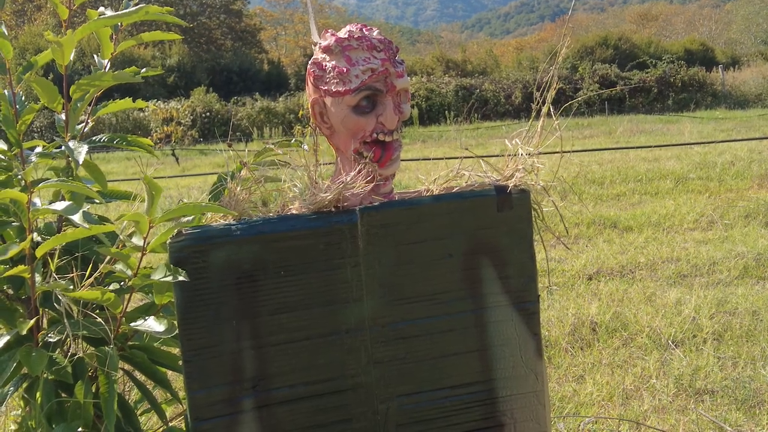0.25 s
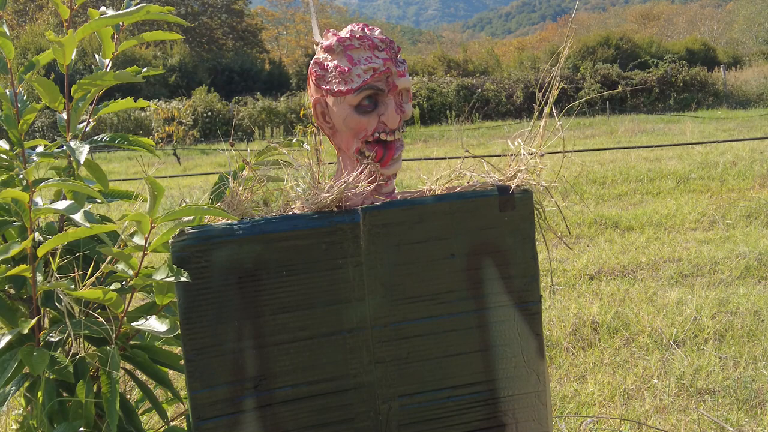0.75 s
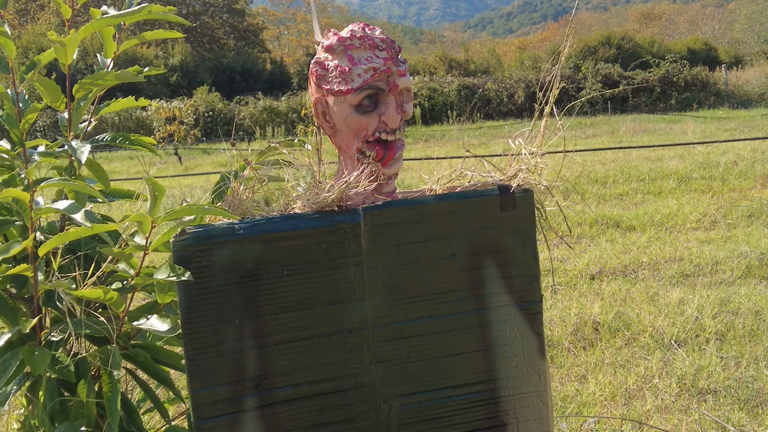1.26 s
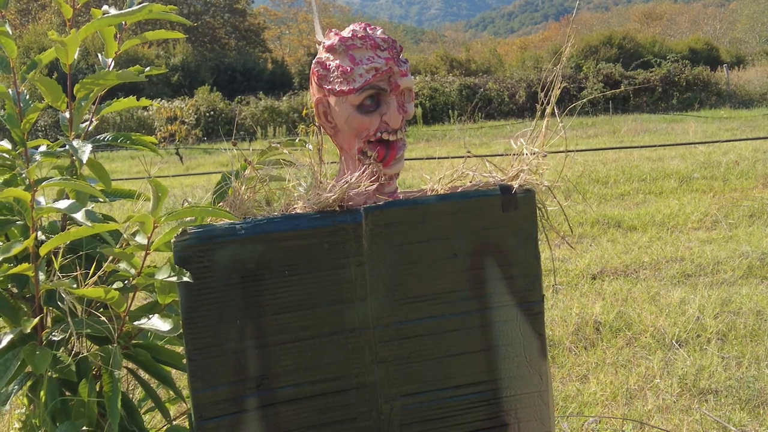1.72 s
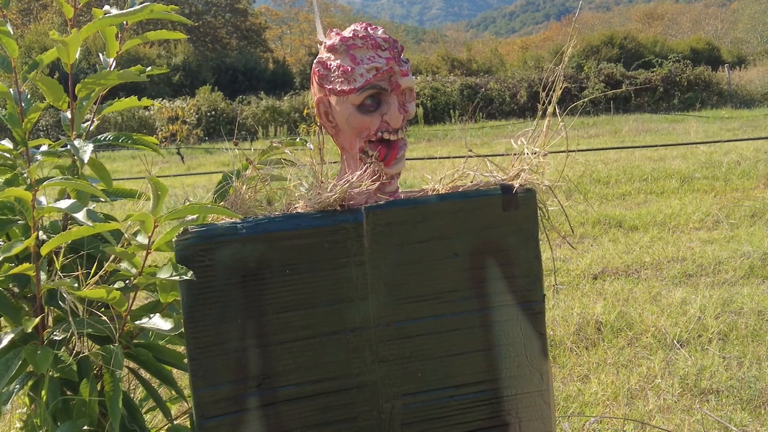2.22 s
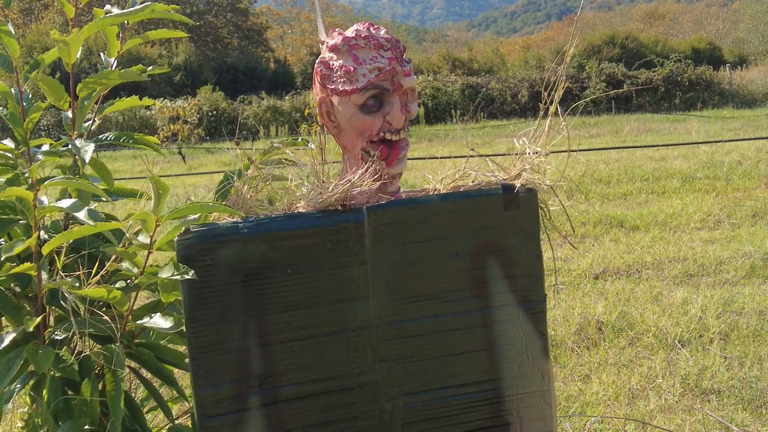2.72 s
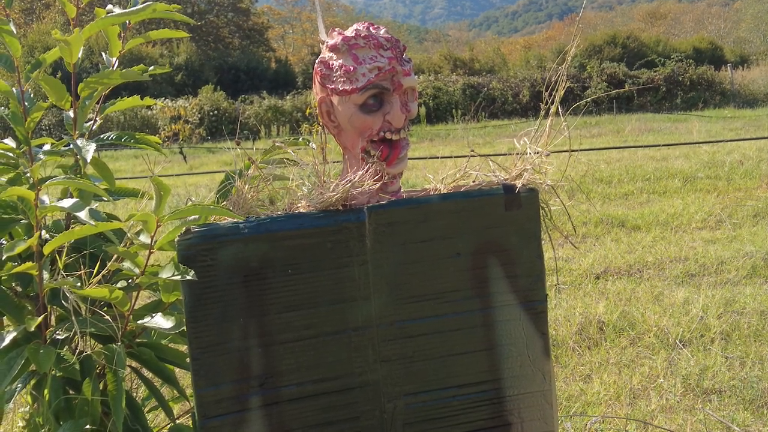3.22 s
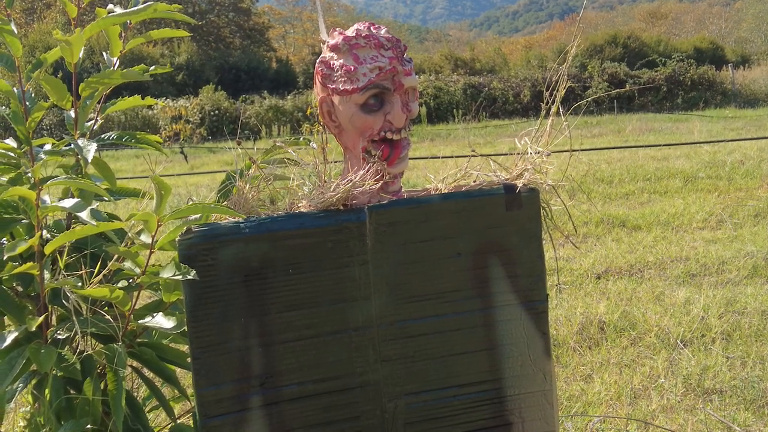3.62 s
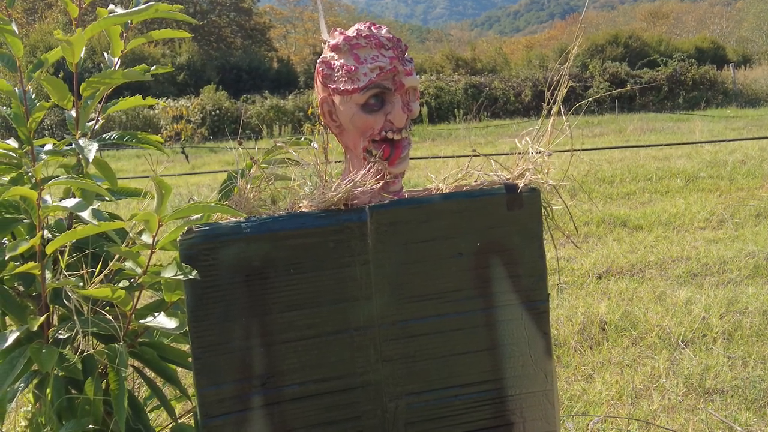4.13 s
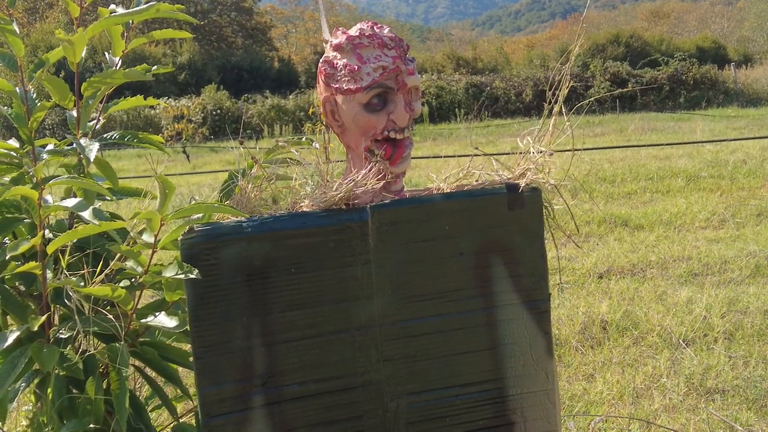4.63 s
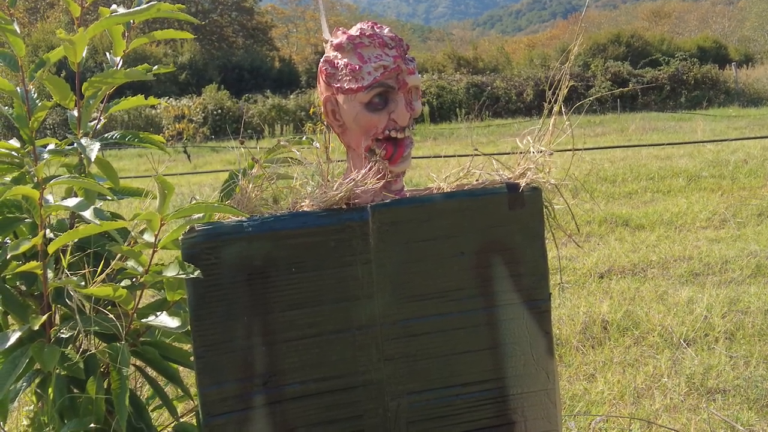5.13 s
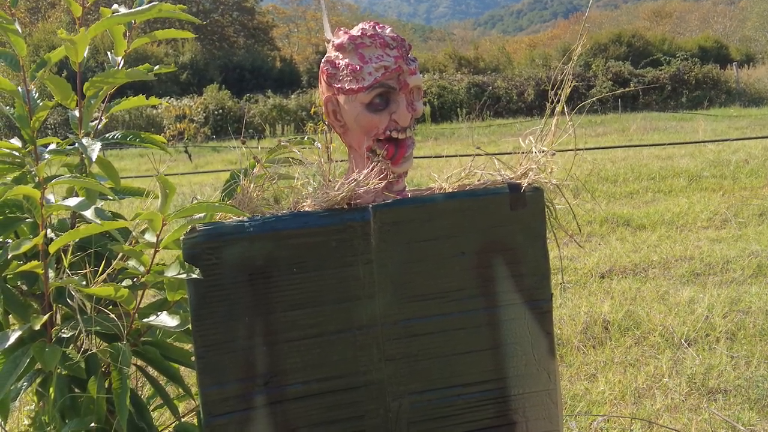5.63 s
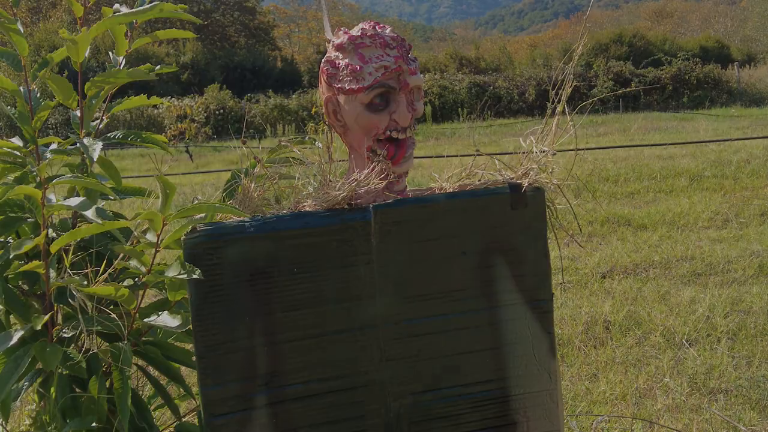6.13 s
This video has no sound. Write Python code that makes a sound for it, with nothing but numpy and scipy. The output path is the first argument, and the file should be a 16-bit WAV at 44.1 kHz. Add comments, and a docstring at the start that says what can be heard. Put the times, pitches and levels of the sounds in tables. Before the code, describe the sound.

A gas air pistol fires close to the microphone in an open field. Five sharp, loud cracks come at about 0.1, 1.4, 2.6, 3.8 and 5.1 seconds. Each has a brief metallic ring and a low thump of gas on the microphone, with the smack of a pellet on a target almost at once. Nearby trees return a soft, bright echo, and a far hedge adds a duller wash that dies within a second. After each shot the trigger is drawn and the magazine turns with a quick cluster of much quieter steel clicks, at about 0.8, 2.0, 3.2, 4.4 and 5.9 seconds. Underneath are quiet open air, a very faint far hum and a light wind rumble, strongest at the start, with short low buffets just after the first and last shots. Everything fades out from about 5.9 to 6.4 seconds.

```python
"""Five sharp cracks of a gas air pistol in an open field, each with the smack of a pellet on a target.
The valve snaps open, gas bursts from the muzzle and thumps the microphone, and the frame rings.
Nearby trees answer brightly, a far hedge with a duller wash. After each shot the trigger is drawn
and the magazine clicks round with small steel ticks. A light wind rumbles over a faint far hum."""
import sys
import numpy as np
from scipy import signal
from scipy.fft import rfft, irfft
from scipy.io import wavfile
from scipy.ndimage import uniform_filter1d, minimum_filter1d

SR = 44100
rng = np.random.default_rng(int(sys.argv[2]) if len(sys.argv) > 2 else 0)


def wav_record(signal):
    """Record a signal, one row per channel, as 16-bit PCM in the file named by sys.argv[1]."""
    frames = np.transpose(np.atleast_2d(signal))
    bounded = np.clip(frames, -1, 1)
    # unit amplitude maps onto the largest positive 16-bit level
    quanta = np.round(bounded * 32767).astype(np.int16)
    wavfile.write(sys.argv[1], SR, quanta)


N = 280476

# Shot cues, with levels ahead of each layer's trim: (valve opens [s], crack [dB], muzzle [dB],
# ring [dB], smack [dB], near echo [dB], far echo [dB], blast left [gain], blast right [gain],
# swirl left [gain], swirl right [gain], swirl rise [s], swirl decay [s])
SHOTS = [(0.103, -8, -5.5, -12.5, -11.5, -48, -48, 0.02, -0.44, 0.49, 3.5, 0.00056, .0145),
         (1.4485, -4, -4, -13.5, -11, -44, -50, 1.5, 0.54, -0.67, -5.5, 0.007, 0.018),
         (2.6108, -3, -2, -15.5, -13, -45.5, -52, 2, .9, -1.8, -5.5, .0035, .0155),
         (3.7669, -3.5, -7, -16.5, -14.5, -45, -52, 2, -0.078, -1.1, -3.5, .0015, .0155),
         (5.1056, -2.1, -2.5, -11.5, -11.5, -51, -51, 2.5, 1.4, .75, 2.5, 0.00044, 0.014)]
# Resonances of the pistol's report: (frequency [Hz], width [Hz], relative boost [dB])
REPORT_MODES = [(1244, 70, 4), (1600, 650, 3.5), (2374, 110, 4), (2990, 230, 4.5), (4070, 61, 4.5),
                (4250, 130, 4), (4710, 120, 3.5), (5230, 100, 6), (5700, 120, 4.5), (6000, 180, 3.5),
                (7800, 300, 3), (9300, 300, 2)]
# Wind rumble: (frequency [Hz], relative level [dB])
WIND_EQ = [(15, -2), (38, 1.5), (60, -9), (85, -12), (105, -20.5), (130, -21.5), (200, -31), (500, -52),
           (3000, -89)]
BLAST_START_S, BLAST_END_S = .0006, .0019  # after the valve opens


def amp(db):
    """Decibels to gain."""
    return 10 ** (np.asarray(db) / 20)


def unit(x):
    """Scales to an rms of one."""
    return x / np.sqrt(np.mean(x ** 2) + 1e-20)


def shape(points, hz):
    """Reads a curve on a log-frequency axis."""
    f, value = np.transpose(points)
    return np.interp(np.log(hz + 1), np.log(f), value)


def clock(seconds):
    """Sample times from zero."""
    return np.arange(int(seconds * SR)) / SR


def add(mix, s, sound):
    """Lays a stereo sound into the mix at time s."""
    part = mix[:, round(s * SR):][:, :sound.shape[1]]
    part += sound[:, :part.shape[1]]


def noise(size, alike):
    """Stereo white noise, from wide (alike=0) to mono (alike=1)."""
    shared, own = rng.standard_normal(size), rng.standard_normal((2, size))
    return np.sqrt(alike) * shared + np.sqrt(1 - alike) * own


def colour(x, eq, ringing=0, modes=REPORT_MODES, size=4096):
    """Minimum-phase EQ of unit power: a smooth curve plus resonances scaled by ringing."""
    hz = abs(np.fft.fftfreq(size, 1 / SR))
    peaks_db = sum(db / (1 + (2 * (hz - f) / width) ** 2) for f, width, db in modes)
    gain = unit(amp(shape(eq, hz) + ringing * peaks_db))
    response = np.exp(np.conj(signal.hilbert(np.log(gain))))
    taps = np.fft.ifft(response).real[:size // 2]
    return signal.oaconvolve(x, taps[None], axes=1)[:, :x.shape[1]]


def dying(t, t60, delay=0):
    """Exponential decay that starts after a delay."""
    return (t >= delay) * np.exp(-np.log(1000) * np.maximum(t - delay, 0) / t60)


def swell(t, db, hold, t60, delay=0, rise=.3):
    """Envelope of an echo from a deep surface: it builds up to its delay, holds, then dies away."""
    build = np.exp(-(np.minimum(t - delay, 0) / rise) ** 2)
    return amp(db) * build * dying(np.maximum(t - delay - hold, 0), t60)


def drift(t, mean_hz):
    """A slow random wander with an rms of one."""
    rate, phase = rng.random((2, 12, 1))
    return unit(np.sin(2 * np.pi * (2 * mean_hz * rate * t + phase)).sum(0))


def burst(envelope, alike):
    """A noise burst under an envelope, its energy spread evenly over frequency."""
    spectrum = rfft(noise(len(envelope), alike) * envelope)
    even = irfft(spectrum / (abs(spectrum) + 1e-12), len(envelope)) * np.sqrt(envelope)
    return unit(even) * np.sqrt(np.mean(envelope ** 2))


def ports(x):
    """The two microphone ports hear a frontal sound out of phase."""
    # (frequency [Hz], lead of the left port [rad])
    phase_lead = [(100, -0.5), (300, 0.9), (650, -2), (1400, -1.53), (2500, 0.5), (5900, -1.76),
                  (8400, -1.64), (11000, -2), (15000, -4.5)]
    turn = np.exp(.5j * shape(phase_lead, np.fft.rfftfreq(N, 1 / SR)))
    return irfft(rfft(x) * np.array([turn, turn.conj()]), N)


def field():
    """The bed: quiet open air and a faint, wavering far hum."""
    # Open air: (frequency [Hz], relative level [dB])
    air_eq = [(100, -5.5), (160, -10), (250, -12), (500, -16), (900, -19.5), (1290, -15.5), (2150, -20.5),
              (4000, -24), (7000, -27.5), (10000, -32), (14500, -26), (16000, -32.5)]
    # Hum: (frequency [Hz], width [Hz], level [dB])
    hum_tones = [(73.6, 3.5, -68.5), (569, 7, -80)]
    t = np.arange(N) / SR
    bed = amp(-64.5) * colour(noise(N, alike=.41), air_eq)
    for hz, width, db in hum_tones:
        waver = signal.lfilter(*signal.butter(2, width / 2, fs=SR), noise(N, alike=.94))
        bed += amp(db) * unit(waver * np.cos(2 * np.pi * hz * t))
    return bed


def wind():
    """A low rumble starts loud around the first shot and sinks into a gently wavering breeze."""
    t = np.arange(N) / SR
    opening_rumble_db = 12 * np.exp(-t / .18)
    level_db = -54.5 + 1.35 * drift(t, mean_hz=.64) + opening_rumble_db
    return amp(level_db) * colour(noise(N, alike=1), WIND_EQ, size=16384)


def eddies(flutter_hz=42):
    """Wind eddies press on the microphone ports in short, fluttering shoves."""
    # (time [s], length [s], pressure left [gain], pressure right [gain], flutter [share of pressure])
    shoves = [(0.111, 0.12, -.02, -0.23, 0.4), (0.224, 0.068, 0.0018, 0.18, 0.74),
              (5.128, 0.18, -0.028, -0.17, 0.39), (5.263, 0.13, 0.065, 0.21, 0.21)]
    out = np.zeros((2, N))
    for s, length, left, right, flutter in shoves:
        t = clock(length)
        pressure = np.outer([left, right], np.sin(np.pi * t / length))
        wobble = np.sin(2 * np.pi * (flutter_hz * t + rng.random()))
        rumble = .34 * colour(noise(len(t), alike=1), WIND_EQ)
        add(out, s, pressure * (1 + flutter * (wobble + rumble)))
    return out


def click(db, body, t60):
    """A steel part snaps home, bounces and rings; body runs from 0, bright pawl, to 1, dull latch."""
    # Tone of each part: (frequency [Hz], relative level [dB])
    pawl_eq = [(200, -23.5), (900, -14), (1500, -9), (2100, -19), (3200, -2), (4500, -2), (6500, -4),
               (9400, -1.5), (11000, -12.5), (14000, -2.5), (16000, -6)]
    latch_eq = [(200, -32.5), (900, -18.5), (1300, -9), (2000, 1), (2800, 1.5), (3600, 1), (6000, -12),
                (9000, -17), (11500, -21), (15000, -15)]
    # Steel resonances: (frequency [Hz], width [Hz], relative boost [dB])
    steel_modes = [(1570, 110, -1), (2200, 130, 1.5), (3025, 250, 3.5), (3730, 200, -4.5), (4460, 180, 3),
                   (6300, 350, 5), (7520, 350, 7.5), (9160, 280, 11.5), (13100, 460, 9)]
    t = clock(.12)
    snap = .55 * dying(t, .008)
    bounce = .3 * body * dying(t, .01, delay=.004)
    ring = .7 * dying(t, t60) + .1 * dying(t, .12)
    attack = 1 - np.exp(-t / .0003)
    rattle = burst(attack * (snap + bounce + ring), alike=.85)
    pawl, latch = (colour(rattle, eq, ringing=.84, modes=steel_modes) for eq in (pawl_eq, latch_eq))
    return amp(db) * ((1 - body) * pawl + body * latch)


def trigger():
    """Each pull takes up slack, snaps the pawl, drops the latch and settles with a faint tick."""
    # Pulls: (pawl time [s], pawl level [dB], latch time [s], latch level [dB], latch t60 [s], settle [s])
    pulls = [(.78, -30, .8282, -30.5, .075, .943), (2.033, -28.5, 2.088, -39.5, .057, 2.1668),
             (3.1707, -30.5, 3.2248, -29.5, .045, 3.3224), (4.339, -43, 4.3893, -30.5, .074, 4.484),
             (5.881, -28.5, 5.9374, -31, .069, 6.013)]
    # Ticks of the slack: (lead on the pawl [s], level [dB], body [0-1], t60 [s])
    slack_ticks = [(.077, -54, 0.79, .045), (.0325, -44.5, .43, .045), (.0215, -46, 0.6, 0.12)]
    out = np.zeros((2, N))
    for pawl_s, pawl_db, latch_s, latch_db, latch_t60, settle_s in pulls:
        for lead, db, body, t60 in slack_ticks:
            add(out, pawl_s - lead, click(db, body, t60))
        add(out, pawl_s, click(pawl_db, body=.21, t60=.042))
        add(out, latch_s, click(latch_db, body=.64, t60=latch_t60))
        add(out, settle_s, click(db=-57.5, body=1, t60=.037))
    return out


def echoes():
    """Shrubs and trees scatter each report brightly, the far hedge dully, over the field's thin wash."""
    # Tone of the returns: (frequency [Hz], relative level [dB])
    near_eq = [(150, -6), (600, -11), (1200, -10), (2300, -1.5), (4500, 1), (5900, -0.5), (6700, -8),
               (8000, -3), (11000, -12.5), (14500, -13), (16000, -17.5)]
    far_eq = [(150, -8), (400, -5), (900, -2), (1300, -1.5), (3000, -1.7), (5800, -7), (6600, -11),
              (7900, -13), (10000, -14), (15000, -23)]
    # Slaps off hard surfaces, relative to the near echo: (delay [s], left [dB], right [dB])
    slaps = [(.073, 3, 1), (.092, 2, 0), (.147, 7.5, 12.5)]
    out, t = np.zeros((2, N)), clock(1.1)
    # The same uneven foliage answers every shot.
    clumps = amp(.74 * unit(uniform_filter1d(rng.standard_normal(len(t)), size=200)))
    shrubs = swell(t, db=-6, delay=.15, hold=.0037, t60=.66)
    trees = swell(t, db=.93, delay=.15, rise=.011, hold=.033, t60=.31)
    hedge = swell(t, db=-.26, delay=.295, rise=.021, hold=.058, t60=1.15)
    near_wash = swell(t, db=-13, delay=.03, rise=.1, hold=.25, t60=1.3)
    far_wash = swell(t, db=-11.5, hold=.17, t60=2.5)
    for s, _, _, _, _, near_db, far_db, *_ in SHOTS:
        near = np.sqrt(shrubs ** 2 + trees ** 2 + near_wash ** 2) * noise(len(t), alike=.07)
        for delay, left_db, right_db in slaps:
            near += amp([[left_db], [right_db]]) * burst(dying(t, .022, delay), alike=.56)
        far = np.hypot(hedge, far_wash) * noise(len(t), alike=.1)
        add(out, s, amp(near_db - 3) * colour(near * clumps, near_eq, ringing=1.3))
        add(out, s, amp(far_db - 3.5) * colour(far * clumps, far_eq, ringing=2))
    return out


def puffs(cut_hz=28):
    """Gas hits the microphone: a short blast ends in a shock, then a swirl pushes or sucks at each port."""
    out, t = np.zeros((2, N)), clock(.4)
    shock = (1 - np.tanh((t - BLAST_END_S + BLAST_START_S) / .00005)) / 2
    blast = np.tanh(t / .0003) * shock
    for s, *_, blast_left, blast_right, swirl_left, swirl_right, rise, decay in SHOTS:
        swirl = (1 - np.exp(-t / rise)) * np.exp(-(t / decay) ** 2)
        add(out, s + BLAST_START_S, np.outer([blast_left, blast_right], blast))
        add(out, s + BLAST_END_S, np.outer([swirl_left, swirl_right], swirl))
    hz = np.fft.rfftfreq(N, 1 / SR)
    bass_cut = 1 - np.exp(-(hz / cut_hz) ** 2)  # zero phase: it swings before and after a puff
    return irfft(rfft(out) * bass_cut, N)


def pellets(flight_s=.0257):
    """Each pellet smacks the target after a short flight, and the board rings briefly."""
    # Tone of the impact and the board: (frequency [Hz], relative level [dB])
    smack_eq = [(150, -9.5), (550, 3.5), (1000, 4), (1600, -3), (2600, -3.5), (4000, -12.5), (5800, -3),
                (8000, -8), (11000, -7.5), (15000, -11.5)]
    board_eq = [(100, -11.5), (300, -0.5), (550, 1), (800, -3.5), (1050, -5), (1500, -13), (2600, -14.5),
                (5500, -16.5), (8000, -19), (15000, -20.5)]
    out, t = np.zeros((2, N)), clock(.5)
    for s, _, _, _, smack_db, *_ in SHOTS:
        smack = colour(burst(dying(t, .0055), alike=.87), smack_eq)
        board = colour(burst(dying(t, .07), alike=.7), board_eq)
        add(out, s + flight_s, amp(smack_db + 3) * smack + amp(smack_db - 12.5) * board)
    return out


def pistol():
    """The valve cracks, gas leaves the muzzle 2 ms later, the frame rings, and leaves scatter a fizz."""
    # Tone of each layer: (frequency [Hz], relative level [dB])
    crack_eq = [(150, -9), (600, -5), (1150, 6), (2000, -0.5), (3000, -4), (5000, 1), (7000, -9.5),
                (9000, -10.5), (11000, -15), (14500, -7.5), (16000, -10.5)]
    muzzle_eq = [(150, -6), (400, 0.5), (750, 5.5), (1050, 7), (1500, 0), (1900, -1.5), (2500, -3),
                 (5000, -2), (7000, -15), (11000, -19.5), (15000, -16.5)]
    ring_eq = [(150, -5), (500, 2.5), (800, 0), (1080, 6.5), (1500, -7), (2200, -8.5), (3500, -5),
               (5300, 0), (6800, -5.5), (8500, -5), (11000, -9), (14500, -3), (16000, -8.5)]
    fizz_eq = [(500, -20), (2000, -11), (5000, -2.5), (6600, -5), (8500, 0), (11500, -4), (14500, 0),
               (16000, -3.5)]
    out, t = np.zeros((2, N)), clock(.5)
    bounce = .25 * dying(t, .005, delay=.0055)  # the crack returns off a surface close by
    for s, crack_db, muzzle_db, ring_db, *_ in SHOTS:
        crack = colour(burst(1.2 * dying(t, .0049) + bounce, alike=.94), crack_eq, ringing=1.6)
        muzzle = colour(burst(1.15 * dying(t, .0048, BLAST_END_S), alike=.88), muzzle_eq, ringing=.98)
        ring = colour(burst(dying(t, .048), alike=.68), ring_eq, ringing=1.8)
        fizz = colour(noise(len(t), alike=.4) * dying(t, .53), fizz_eq, ringing=.8)
        add(out, s, amp(crack_db) * crack + amp(muzzle_db) * muzzle + amp(-44.5) * fizz)
        add(out, s + BLAST_END_S, amp(ring_db + 2) * ring)
    return out


def scene():
    """The pistol, its target and its echoes over the breezy field."""
    return field() + wind() + eddies() + echoes() + puffs() + ports(trigger() + pellets() + pistol())


def record(dry, threshold=.5, max_dip_db=6, hold_s=.16, ease_s=.11):
    """A look-ahead limiter dips around each shot and leftover peaks clip; then a fade and a low-pass."""
    over_db = np.clip(20 * np.log10(abs(dry).max(0) / threshold + 1e-9), 0, max_dip_db)
    held_db = minimum_filter1d(-over_db, size=int(hold_s * SR))
    gain_db = uniform_filter1d(held_db, size=int(ease_s * SR))
    limited = np.clip(dry * amp(gain_db), -1, 1)
    fade_start_s, fade_s = 5.875, .57
    fade = np.clip(1 - (np.arange(N) / SR - fade_start_s) / fade_s, 0, 1)
    low_pass = signal.firwin(255, cutoff=16100, window=("kaiser", 8), fs=SR)
    return signal.oaconvolve(limited * amp(-.5) * fade, low_pass[None], "same")


dry = scene()
out = record(dry)
wav_record(out)
```